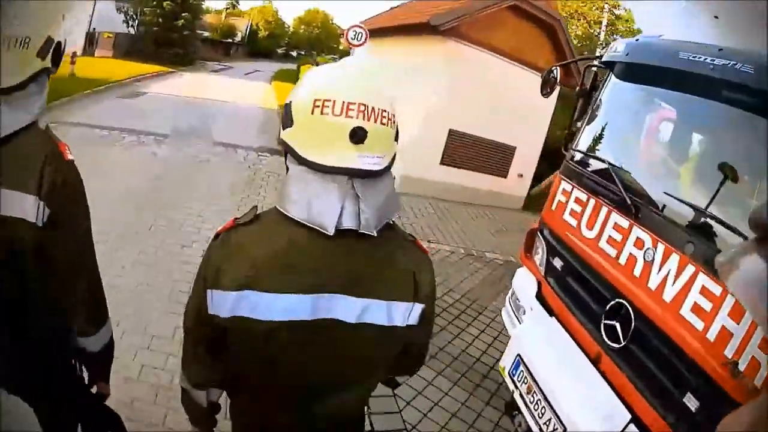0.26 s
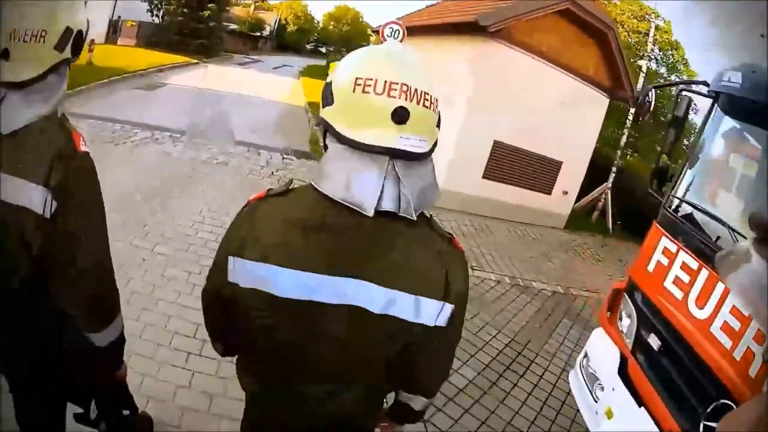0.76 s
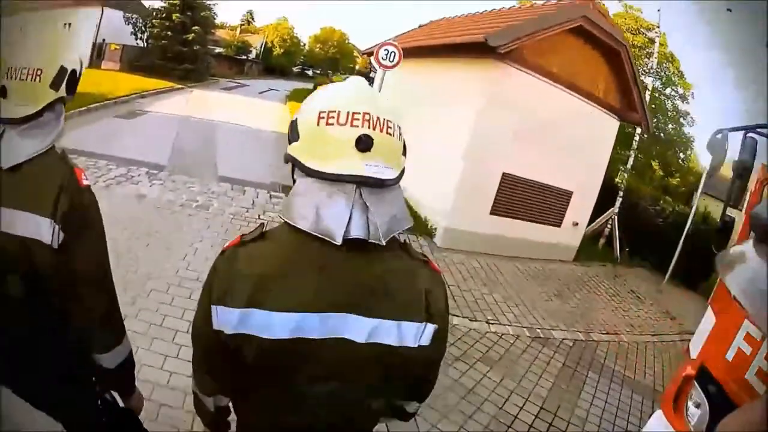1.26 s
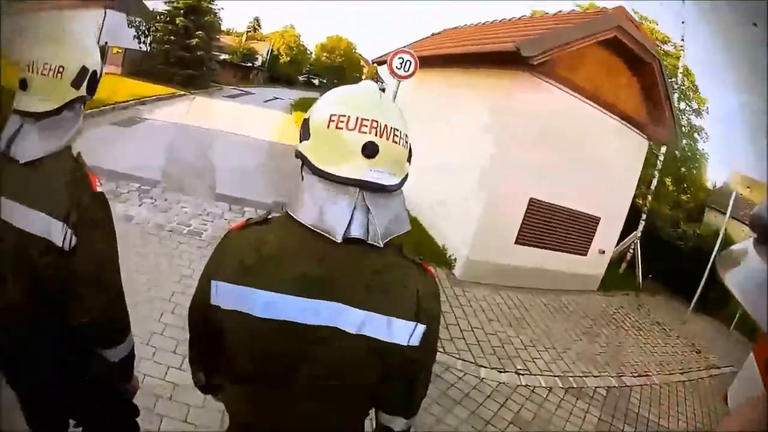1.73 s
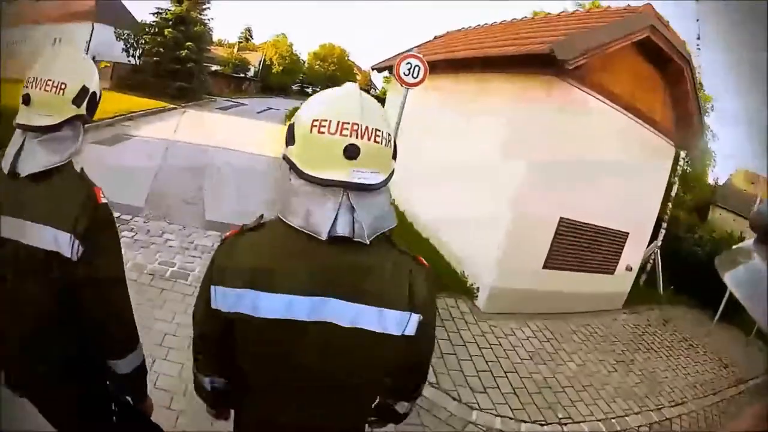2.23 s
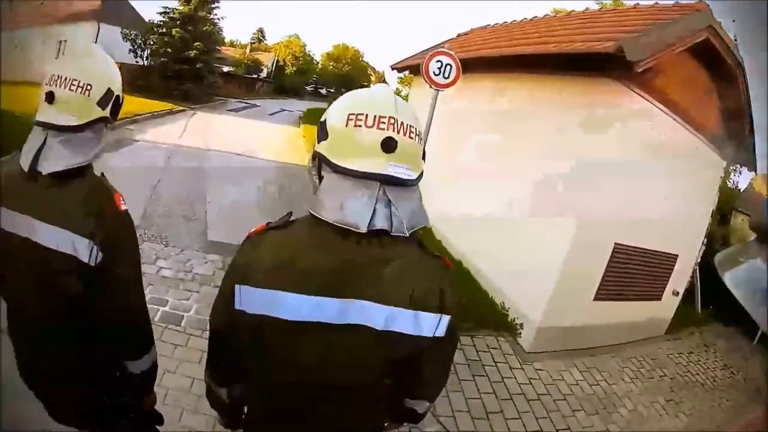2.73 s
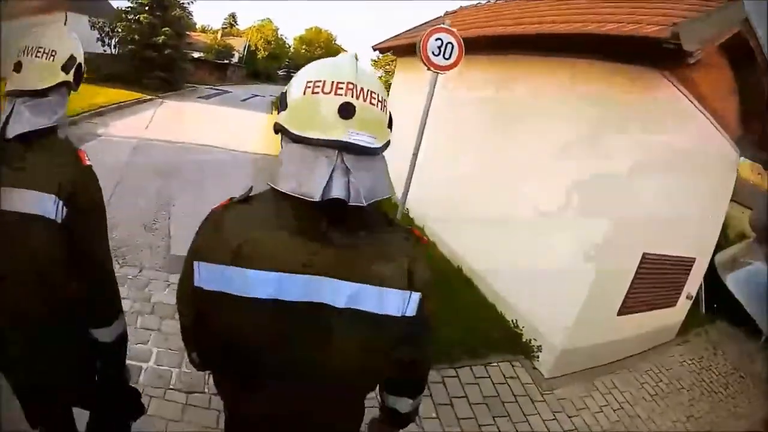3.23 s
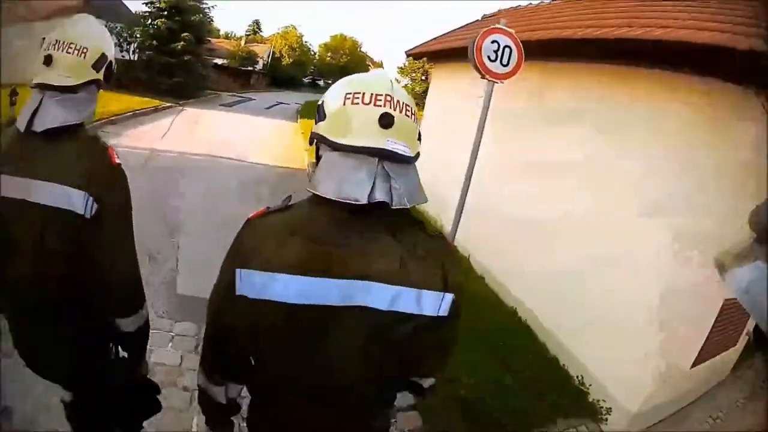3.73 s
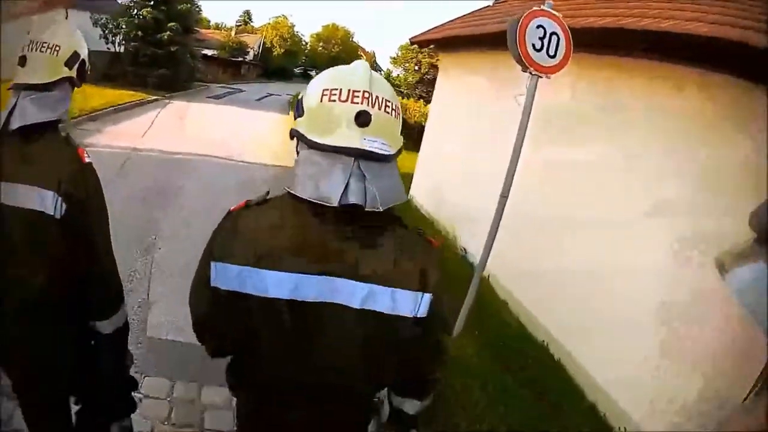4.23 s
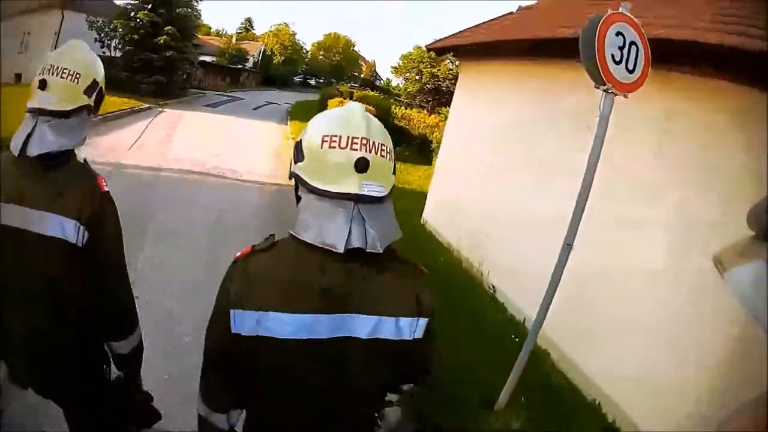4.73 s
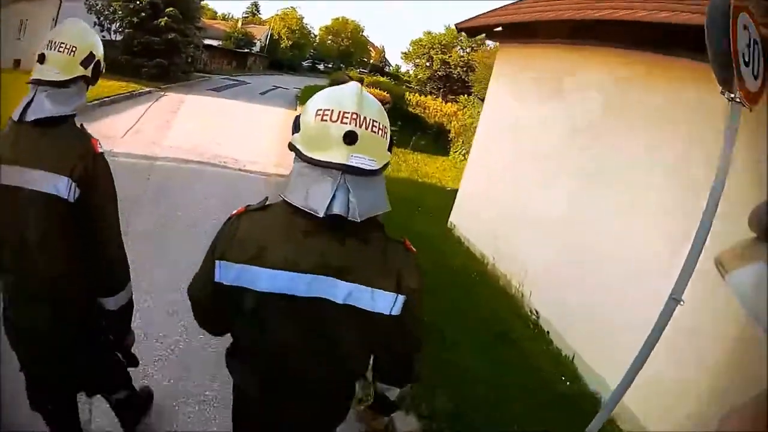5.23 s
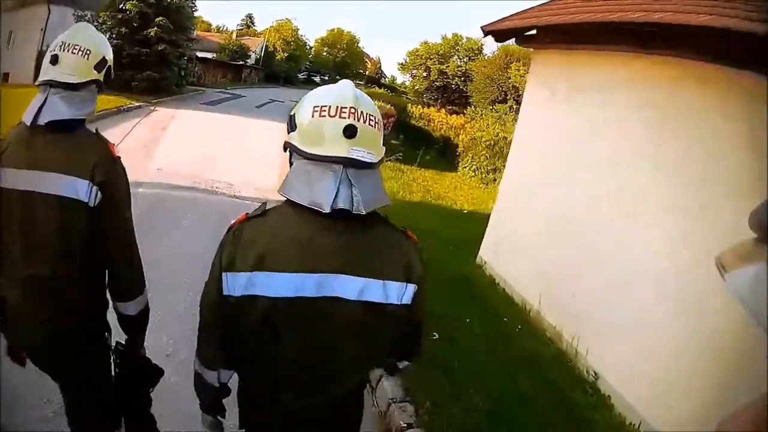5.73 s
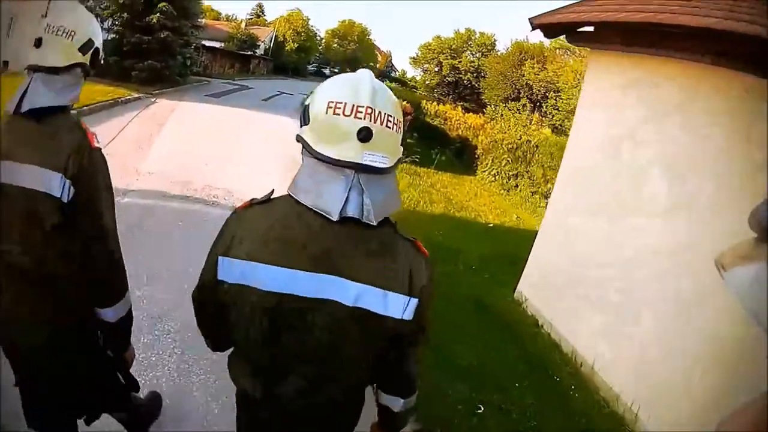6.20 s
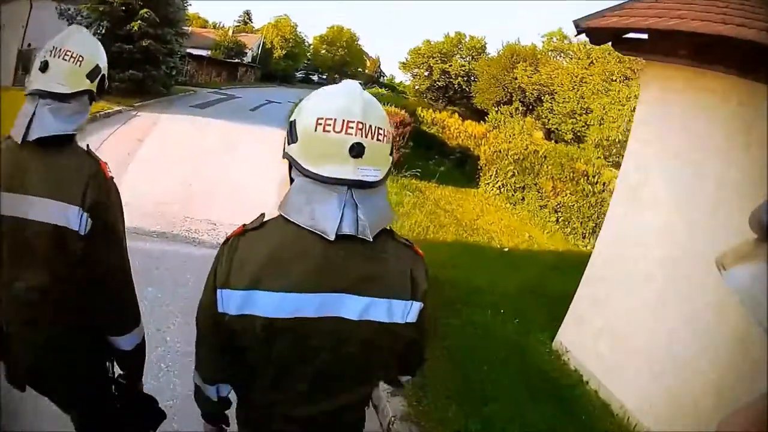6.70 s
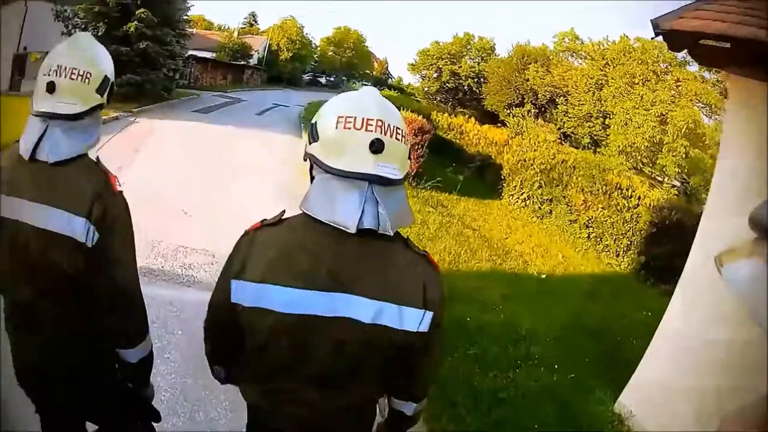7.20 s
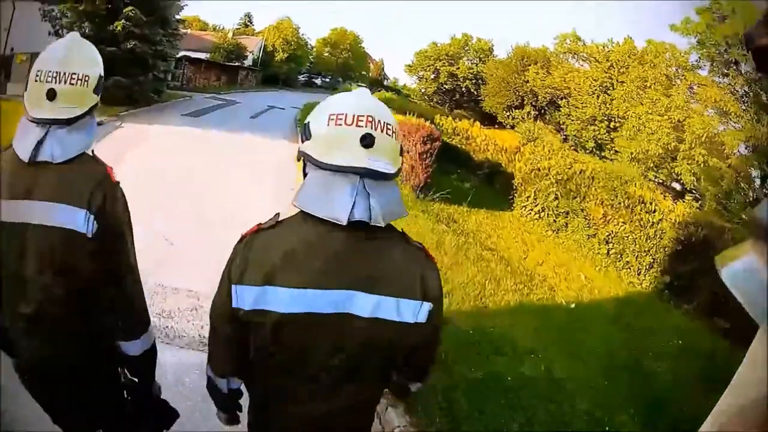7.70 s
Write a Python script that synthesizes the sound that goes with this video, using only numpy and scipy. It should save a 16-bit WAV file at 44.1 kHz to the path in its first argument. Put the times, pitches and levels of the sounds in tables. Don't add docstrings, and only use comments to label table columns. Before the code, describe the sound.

Outdoors on paving, a small camera mounted on a marching walker picks up every step as a close, deep jolt. The first thud lands at 0.3 s, with a plastic clack just before it; a soft shuffle and sleeve swish follow near 0.7 s. From 1.15 s the march is steady, a thud about every 0.45 s until 7.6 s, heaviest around 4.8 s and lighter at 1.65, 4.4 and 7.6 s. Each has a heel knock, a low drop, quick softening bounces and a short swaying rumble, with fine sand crackling under the sole. Hard plastic clacks mark many steps, often every second one. Between them buckles and straps tick lightly and stiff jackets creak and rustle. Faint lifting knocks come late in some strides. Behind lies the dull, blurred tread of others and weak air hiss. The sound is dry, with a coarse digital edge on the highs.

```python
import sys
import numpy as np
from scipy import signal
from scipy.fft import rfft, irfft, next_fast_len
from scipy.io import wavfile
from scipy.ndimage import map_coordinates

SR = 44100
rng = np.random.default_rng(int(sys.argv[2]) if len(sys.argv) > 2 else 0)


def put_to_file(sound):
    columns = np.atleast_2d(sound).T
    safe = np.clip(columns, -1, 1)
    whole_steps = np.round(safe * 32767)
    wavfile.write(sys.argv[1], SR, whole_steps.astype(np.int16))


def gain_from_db(level_db):
    decades = np.asarray(level_db, float) / 20
    return 10 ** decades


N = 350681
USUAL_DB = -17


def unit(x):
    return x / np.sqrt(np.mean(x ** 2) + 1e-20)


def filtered(x, response):
    m = next_fast_len(N + 8192)
    return irfft(rfft(x, m) * response(np.fft.rfftfreq(m, 1 / SR)), m)[:N]


def noise(points):
    f, db = np.transpose(points)

    def spectrum(hz):
        return gain_from_db(np.interp(np.log(hz + 1), np.log(f), db))

    return unit(filtered(rng.standard_normal(N), spectrum))


def wobble(rate):
    knots = rng.standard_normal(int(N * rate / SR) + 4)
    return map_coordinates(knots, [np.arange(N) * rate / SR])


def ring(t, hz, t60, attack):
    u = np.clip(t, 0, None)
    return np.sin(2 * np.pi * hz * u) * gain_from_db(-60 * u / t60) * (1 - np.exp(-u / attack))


def add(track, s, piece):
    part = track[round(s * SR):][:len(piece)]
    part += piece[:len(part)]


def knock(t, width, lobe):
    u = (t / width) ** 2
    return (1 - lobe * u) / (1 + u) ** 2


def swell(rest_db, swell_db, rise):
    t = np.arange(N) / SR
    total = 0
    for s, db, *_ in STEPS:
        u = np.clip(t - s + 0.054, 0, None) / rise
        total = total + gain_from_db(db - USUAL_DB) * u * np.exp(1 - u)
    return rest_db + swell_db * total


# frequency in Hz, level in dB per Hz.
MOUNT_DRIFT = [(8, -30), (18, -2), (30, 0), (42, -8), (55, -18), (120, -60)]
# frequency in Hz, level in dB per Hz.
GROUND_TREAD = [(40, -23.5), (70, 1.5), (160, 0), (300, -3.5), (345, -8), (380, -2.5), (420, -8.5),
                (600, -20), (1200, -27)]
# frequency in Hz, level in dB per Hz.
OPEN_AIR = [(200, -18), (500, 2.5), (900, 0), (1900, -6.5), (2280, -2.5), (2700, -7.5), (4500, -9.5),
            (6000, -17.5), (9000, -37)]


def surroundings():
    drift_db = swell(rest_db=-61.5, swell_db=12, rise=0.035) + 2.7 * wobble(2.5) + 3 * wobble(7)
    tread_db = swell(rest_db=-62, swell_db=2.3, rise=0.071) + 2.06 * wobble(12)
    air_db = swell(rest_db=-70, swell_db=4.8, rise=0.031) + 0.41 * wobble(15)
    return gain_from_db(drift_db) * noise(MOUNT_DRIFT) + gain_from_db(tread_db) * noise(GROUND_TREAD) + gain_from_db(air_db) * noise(OPEN_AIR)


# start in seconds, creak in dB, hiss over it in dB, length in seconds.
CLOTH_CREAKS = [(0.23, -56, -31, 0.039), (0.2474, -47.5, -1, 0.017), (0.325, -54, -19, 0.012),
                (0.617, -55.5, -9, 0.033), (0.71, -55, -10, 0.077), (0.795, -57.5, -19, 0.068),
                (1.118, -43, -27, 0.011), (1.559, -54.5, -10, 0.031), (2.509, -52, -9.5, 0.022),
                (2.573, -58, 1, 0.014), (2.599, -52.5, -26, 0.015), (2.946, -54, -7.5, 0.058),
                (2.99, -44.5, -11, 0.019), (3.454, -56, -5, 0.05), (3.995, -52, -8, 0.039),
                (4.035, -48.5, -4.5, 0.009), (4.265, -52.5, -18, .012), (4.342, -56, -11, 0.036),
                (4.3733, -45, -8.5, 0.02), (4.787, -45, -13, 0.033), (4.811, -46, -6, 0.019),
                (5.217, -61, -3.5, 0.12), (5.74, -52.5, -4.5, 0.026), (5.914, -55.5, -12, 0.045),
                (6.226, -55, -12, 0.021), (6.761, -51, -10, 0.029), (7.703, -59, -13, .027),
                (7.729, -53.5, -16, 0.016)]
# start in seconds, hiss in dB, length in seconds, brightness from 0 to 1.
SLEEVE_SWISHES = [(0.275, -55.5, 0.028, 0.2), (0.744, -48, 0.033, 0.85), (1.196, -51.5, 0.028, 0.43),
                  (1.604, -64, 0.065, 0.4), (3.053, -60.5, 0.045, 0.46), (3.082, -61, 0.044, 0.14),
                  (3.864, -54, 0.044, 0.27), (3.926, -59.5, 0.018, 0.2), (4.828, -52, 0.023, 0.3),
                  (6.281, -62, 0.024, 0.54), (6.332, -62, 0.023, 0.6), (6.672, -54.5, 0.016, 0.5),
                  (6.739, -54, 0.046, 0.78), (7.07, -60.5, 0.034, 0.2), (7.144, -60, 0.021, 0.3),
                  (7.572, -65, 0.042, 0.2)]
# seconds from the drop, dB relative to the drop,
# hiss over the creak in dB, length in seconds.
STEP_FOLDS = [
    (-.075, -48.5, -7, 0.015),
    (0.023, -45, -12, 0.048),
]


def strokes():
    folds = [(s + d, db + g, h, length) for s, db, *_ in STEPS for d, g, h, length in STEP_FOLDS]
    creaks = [(s, db, db + h, length, 0.26) for s, db, h, length in CLOTH_CREAKS + folds]
    swishes = [(s, db + 2 - 10.5 * share, db, length, share) for s, db, length, share in SLEEVE_SWISHES]
    return creaks + swishes


# frequency in Hz, width in Hz, level in dB.
WEAVE_MODES = [(2250, 140, 11.5), (3400, 190, 2), (4000, 230, -15)]
# frequency in Hz, level in dB per Hz.
ROUGH_HISS = [(500, -13), (1500, 1.5), (3300, 5.5), (4000, 12), (5000, -41), (9000, -48)]
# frequency in Hz, level in dB per Hz.
SLICK_HISS = [(2000, -23), (3800, -9), (5200, 2), (5800, -4.5), (9000, -27)]


def weave(f):
    total = 0
    for k, (hz, width, db) in enumerate(WEAVE_MODES):
        total = total + (-1) ** k * gain_from_db(db) * 1j * f * width / (hz * hz - f * f + 1j * f * width)
    return total


def jackets():
    creak, dull, bright = np.zeros((3, N))
    t = np.arange(SR // 4) / SR
    for s, db, hiss_db, length, brightness in strokes():
        share = np.clip(brightness, 0, 1)
        rise = 0.0015 + 0.015 * share ** 4
        stroke = np.exp(-(t / length) ** 2) * (1 - np.exp(-t / rise))
        add(creak, s, gain_from_db(db - 10) * stroke)
        add(dull, s, gain_from_db(hiss_db - 4.5) * np.sqrt(1 - share) * stroke)
        add(bright, s, gain_from_db(hiss_db - 5.0) * np.sqrt(share) * stroke)
    catch = gain_from_db(2.63 * wobble(150) + 1.57 * wobble(500))
    rubbed = creak * unit(filtered(catch * rng.standard_normal(N), weave))
    return rubbed + dull * unit(catch * noise(ROUGH_HISS)) + bright * unit(catch * noise(SLICK_HISS))


# start in seconds, peak in dB, pitch in Hz.
FITTING_TICKS = [(0.795, -56.5, 1630), (1.66, -54.5, 1520), (1.957, -66, 910), (2.114, -48, 820),
                 (2.143, -51.5, 1470), (2.568, -50.5, 1470), (2.602, -54, 800), (3.019, -50, 714),
                 (4.368, -50, 810), (4.839, -48, 1470), (4.872, -51.5, 1100), (4.942, -57.5, 1510),
                 (5.315, -53, 716), (5.347, -50, 900), (5.779, -54, 1080), (5.839, -55, 810),
                 (6.146, -54, 802), (6.191, -49, 1060), (6.234, -53, 826), (6.603, -61, 750),
                 (6.688, -52.5, 1470),
                 (.220, -54, 2190), (.716, -57, 2230), (.72, -52.5, 715), (0.799, -46, 397), (1.625, -53, 720),
              (2.53, -51, 700), (2.604, -52, 2250), (2.949, -59, 2180), (3.181, -62, 380),
              (4.101, -50, 385), (5.008, -52, 380), (5.905, -49.5, 380), (6.815, -49.5, 380)]


def buckles():
    out, t = np.zeros(N), np.arange(SR // 20) / SR
    dull = signal.butter(2, (600, 3000), "band", fs=SR)
    for s, db, hz in FITTING_TICKS:
        crack = gain_from_db(-1 - 60 * t / 0.0084) * signal.lfilter(*dull, rng.standard_normal(len(t)))
        body = ring(t, hz, t60=0.041, attack=0.00093)
        overtone = ring(t, 1.38 * hz, t60=0.011, attack=0.0003)
        add(out, s, gain_from_db(db) * (body + overtone + crack))
    return out


# start in seconds, drop on the lower stop in dB, then knocks on the upper stop
# in dB for heel strike, rebound and late bounce.
STEPS = [(0.2719, -16.4, -22.6, -29.5, -30.8), (1.1462, -16.0, -20.9, -26.7, -32.9),
         (1.6503, -20.1, -25.0, -33.5, -45.6), (2.1042, -18.2, -24.8, -33.5, -34.0),
         (2.561, -18.6, -24.4, -30.5, -38.0), (3.0081, -15.0, -22.6, -26.5, -31.9),
         (3.4603, -16.8, -23.6, -29.0, -37.2), (3.918, -15.6, -21.7, -28.6, -35.7),
         (4.3621, -20.5, -27.0, -32.0, -42.3), (4.8318, -13.2, -18.4, -22.3, -31.6),
         (5.2935, -15.1, -22.1, -24.8, -29.0), (5.7478, -15.2, -23.5, -29.6, -34.2),
         (6.1809, -16.0, -22.6, -24.6, -38.5), (6.6408, -17.2, -25.1, -30.6, -35.0),
         (7.1061, -18.4, -25.0, -29.6, -40.6), (7.5765, -19.9, -29.2, -35.6, -33.1)]
# start in seconds, drop in dB, lurch in dB, sway in dB.
SOFT_STEP = [
    (.7136, -36.5, 43.3, 2.8),
]
# seconds after the drop, usual level in dB, seconds later per dB (a weak swing
# takes longer), width in seconds, lobe as a ratio.
UPPER_STOP = [
    (-.0216, -23.5, .00035, .0035, 1.9),
    (.0211, -29.5, -.00022, .005, 2.1),
    (.0543, -35.5, -.0003, .0057, 1.5),
]
# start in seconds, level in dB.
LIFT_KNOCKS = [(0.428, -42), (3.186, -47), (4.095, -45), (5.02, -44), (5.915, -44.5), (6.818, -43),
               (7.729, -44)]


def footfalls():
    out, lead = np.zeros(N), .1
    t = np.arange(SR // 2) / SR - lead
    shake = np.pad(noise([(60, -26), (110, 7.0), (250, -0.5), (380, -10.5), (700, -37.5), (1500, -51)]), (0, SR))
    fade = np.clip(t + 0.036, 0, None) / 0.02
    falls = [(s, db, 45 + db - USUAL_DB, -3.2 + .55 * (db - USUAL_DB)) for s, db, *_ in STEPS]
    for s, db, lurch_db, sway_db in falls + SOFT_STEP:
        drop = .9 * knock(t, width=.0051, lobe=1.54)
        drop = drop + gain_from_db(-15.5) * knock(t, width=0.002, lobe=0.5)
        lurch = gain_from_db(lurch_db - 18.4) * ring(t + .0288, hz=27.7, t60=.308, attack=1)
        sway = gain_from_db(sway_db) * ring(t - .008, hz=27.7, t60=.446, attack=.014)
        loose = gain_from_db(-25.5) * shake[round(s * SR):][:len(t)] * fade * np.exp(1 - fade)
        housing = gain_from_db(-36.0 + rng.normal(0, 1.3)) * ring(t, hz=380, t60=0.13, attack=0.0049)
        shiver_hz = 72 + rng.normal(0, 6.5)
        shiver = gain_from_db(-26 + rng.normal(0, 4.5)) * ring(t - .066, shiver_hz, t60=0.23, attack=0.0071)
        add(out, s - lead, gain_from_db(db) * (sway - lurch - drop + loose + housing + shiver))
    for s, _, *knocks in STEPS:
        for db, (after, usual_db, later, width, lobe) in zip(knocks, UPPER_STOP):
            add(out, s - lead + after + later * (db - usual_db), gain_from_db(db) * knock(t, width, lobe))
    for s, db in LIFT_KNOCKS:
        add(out, s - lead, gain_from_db(db) * knock(t, width=0.0026, lobe=0.74))
    return out


def grit(count=70):
    out, t = np.zeros(N), np.arange(SR // 60) / SR
    for s, db, *_ in STEPS:
        for when, pitch, size in rng.random((count, 3)):
            hz = 500 * 9 ** pitch
            level_db = db - 38.5 - 10 * when - 6 * pitch - 3 * np.log(size + 0.076)
            add(out, s - .03 + .14 * when, gain_from_db(level_db) * ring(t, hz, t60=12 / hz, attack=0.000096))
    return out


# start in seconds, peak in dB.
PLASTIC_CLACKS = [(0.2499, -33), (1.1244, -33.5), (2.0831, -37.5), (2.9855, -35), (3.1775, -58.5),
                  (3.4408, -40.5), (3.8959, -38), (4.808, -33), (5.007, -59), (5.2712, -38.5),
                  (5.7231, -38), (5.9035, -60.5), (6.6208, -42), (6.8122, -54.5), (7.5556, -37.5),
                  (5.7326, -49)]
# frequency in Hz, level in dB, t60 in seconds.
SHELL_MODES = [(1304, 0, 0.0027), (1600, 8, 0.0025), (1835, 0.5, 0.015), (2080, -11.5, 0.02),
               (2680, -14, 0.0027), (3730, -55, 0.024)]
# frequency in Hz, level in dB, t60 in seconds.
HOLLOW_MODES = [(380, -7, 0.12), (802.4, 1, 0.034), (885, -5, 0.038), (1103, -2.5, 0.018)]


def clacks():
    out, t = np.zeros(N), np.arange(SR // 8) / SR
    dull = signal.butter(3, (750, 3300), "band", fs=SR)
    crisp = signal.butter(3, (900, 3900), "band", fs=SR)

    def struck(modes, delay, attack):
        return sum(gain_from_db(db + rng.normal(0, 1.5)) * ring(t - delay, hz, t60, attack) for hz, db, t60 in modes)

    for s, db in PLASTIC_CLACKS:
        hollow_db = -1.5 - 0.54 * (db + 39.5)
        snap = struck(SHELL_MODES, 0, attack=.0003)
        snap = snap + gain_from_db(-7.5 - 60 * t / 0.033) * signal.lfilter(*dull, rng.standard_normal(len(t)))
        snap = snap + gain_from_db(-8 - 60 * t / 0.0064) * signal.lfilter(*crisp, rng.standard_normal(len(t)))
        hollow = gain_from_db(-2.5) * struck(HOLLOW_MODES, 0, attack=.0006)
        hollow = hollow + gain_from_db(8.5) * struck(HOLLOW_MODES, .0045, attack=.0006)
        add(out, s, -gain_from_db(db + 3.5) * (snap + gain_from_db(hollow_db - 9.0) * hollow))
    return out


def scene():
    return (surroundings() + jackets() + buckles() + footfalls() + grit() + clacks())[None]


def roll_off(x):
    return signal.sosfilt(signal.butter(12, 15790, fs=SR, output="sos"), x)


def record(dry):
    hold_hz, top_hz = 12000, 15800
    smooth = filtered(dry[0], lambda hz: 1 / np.sqrt(1 + (hz / 5600) ** 40))
    slow = signal.resample(np.pad(smooth, (0, 8 * SR - N)), 8 * hold_hz)
    held = signal.resample(np.repeat(slow, 4), 8 * SR)[1:N + 1]
    limited = filtered(held, lambda hz: (hz < top_hz) / np.sqrt(1 + (hz / 15100) ** 60))
    return roll_off(limited[None])


dry = scene()
out = record(dry)
put_to_file(out)
```